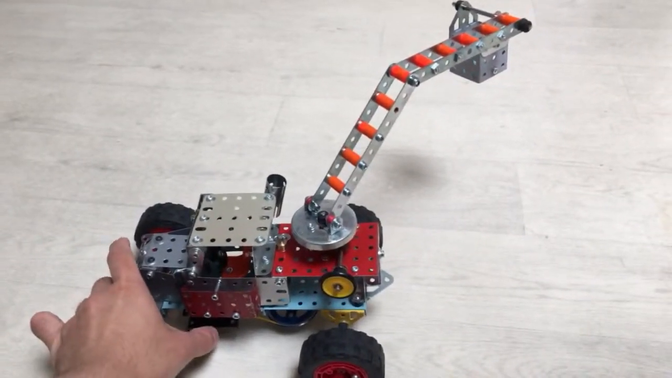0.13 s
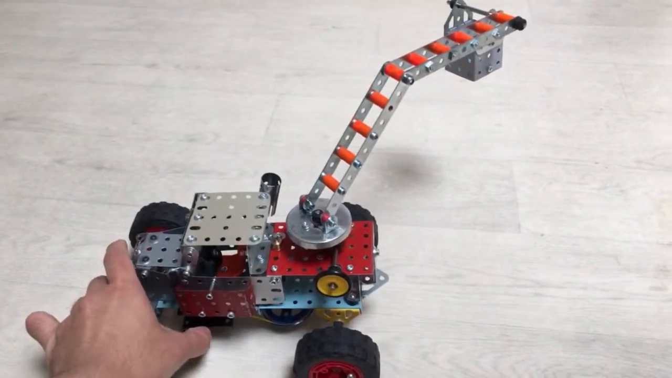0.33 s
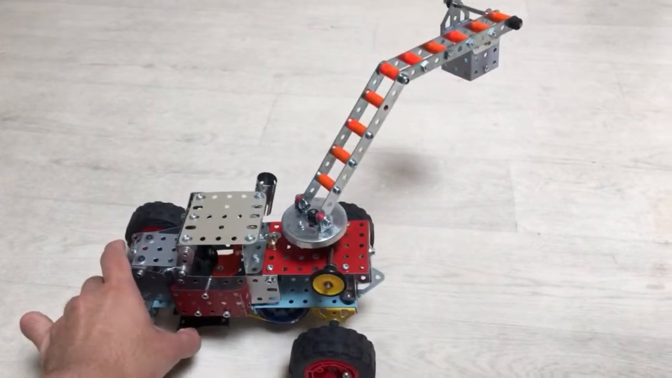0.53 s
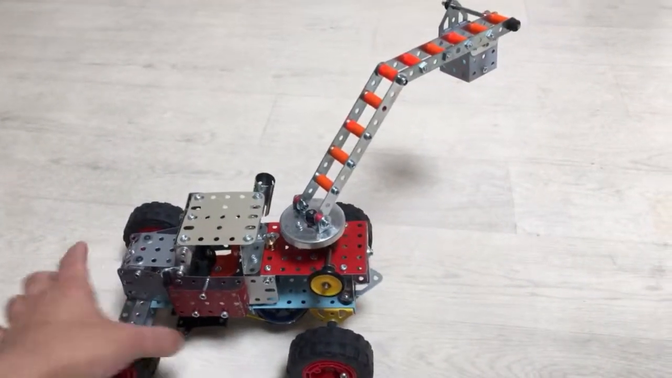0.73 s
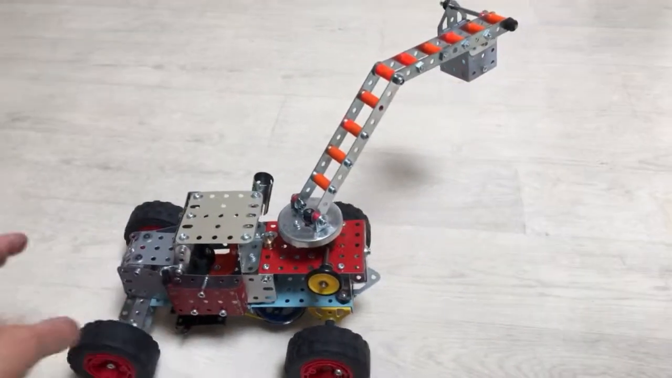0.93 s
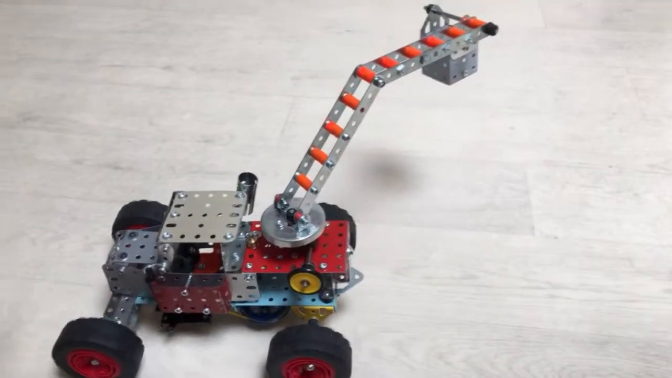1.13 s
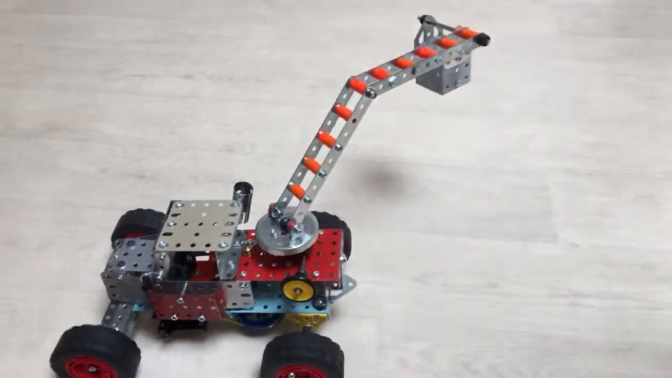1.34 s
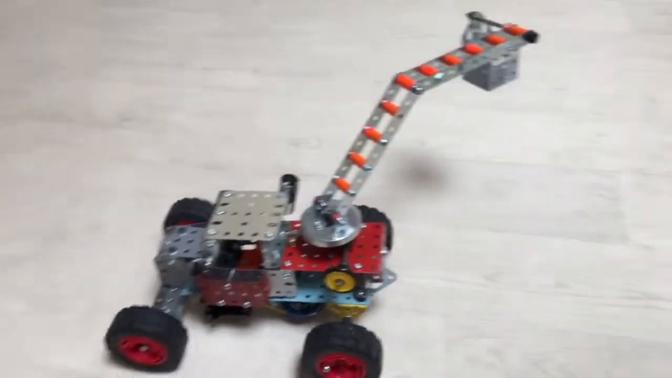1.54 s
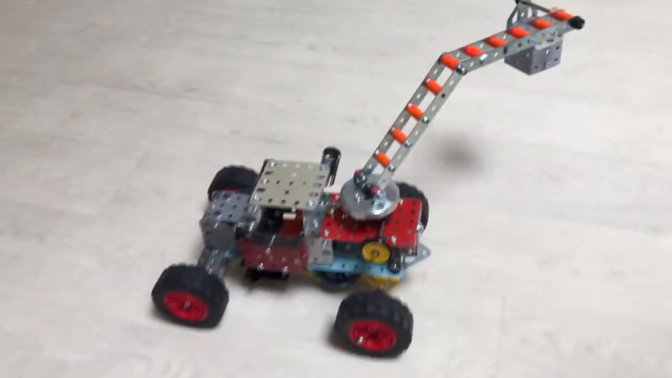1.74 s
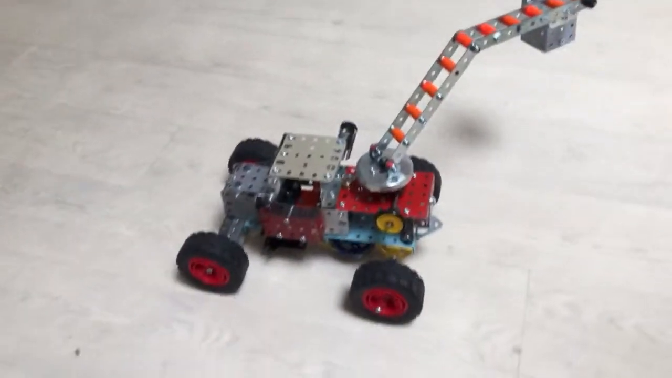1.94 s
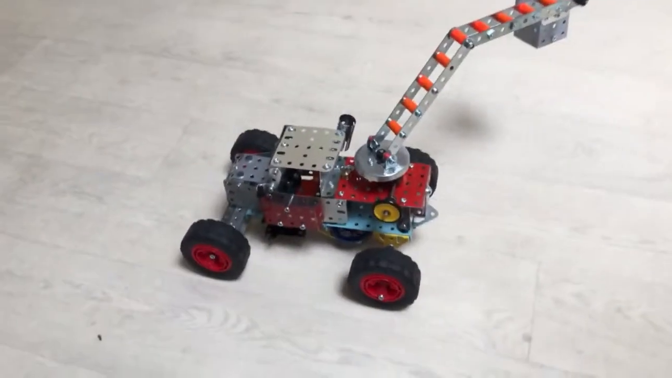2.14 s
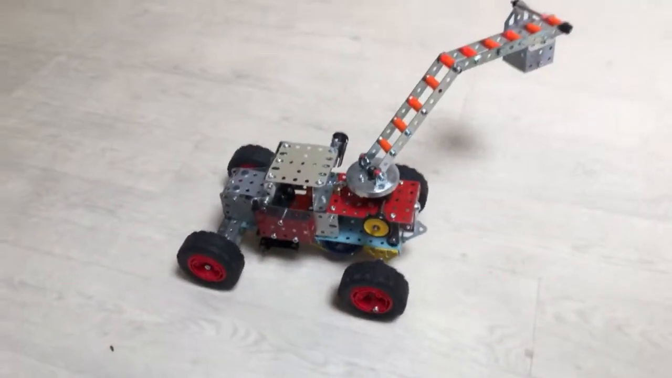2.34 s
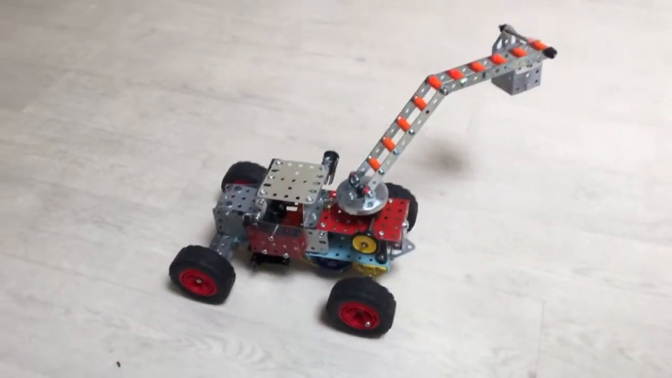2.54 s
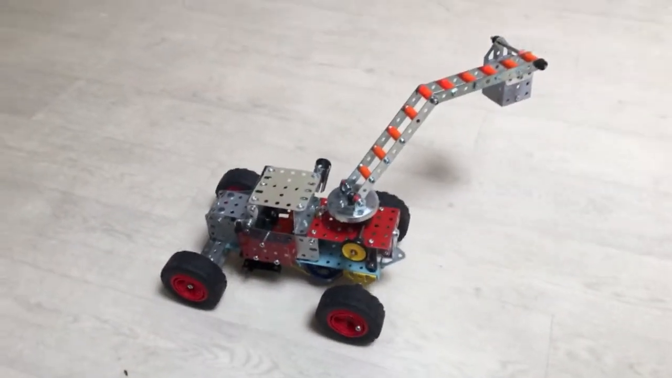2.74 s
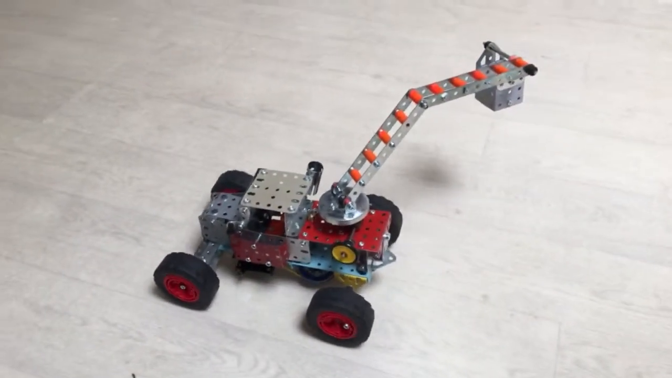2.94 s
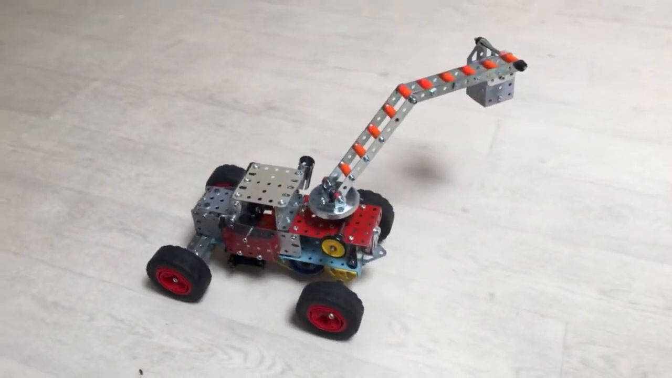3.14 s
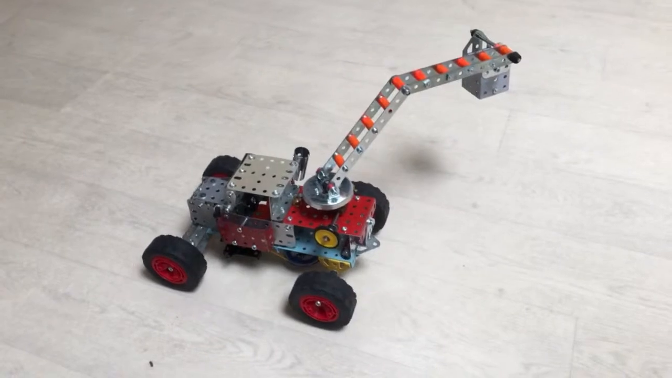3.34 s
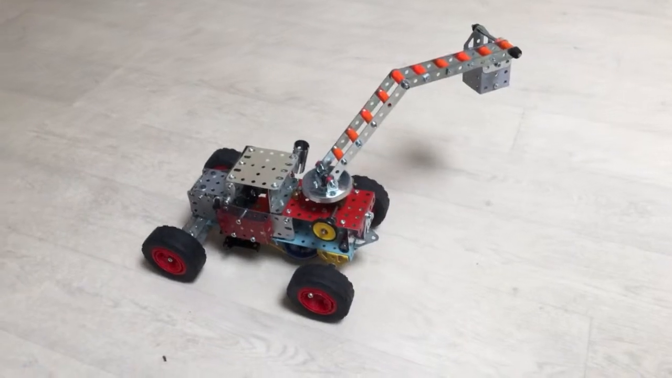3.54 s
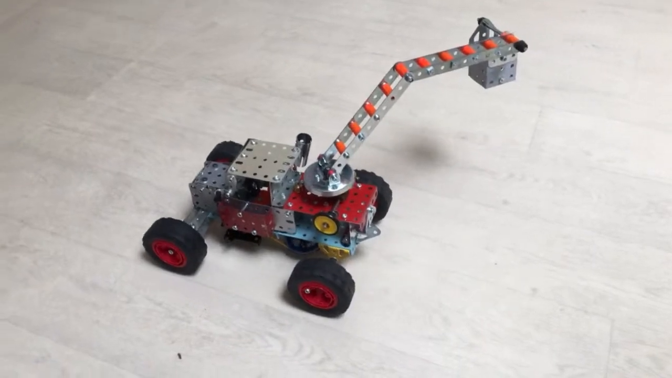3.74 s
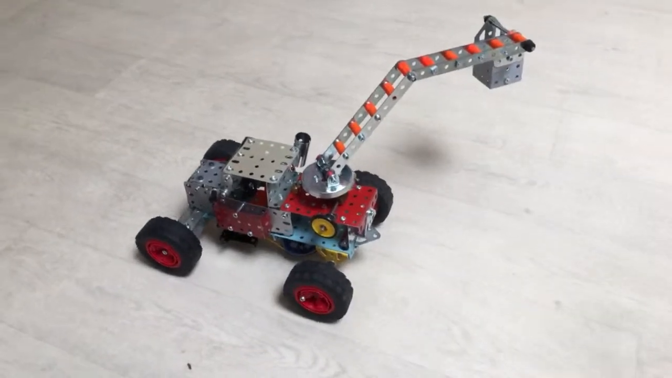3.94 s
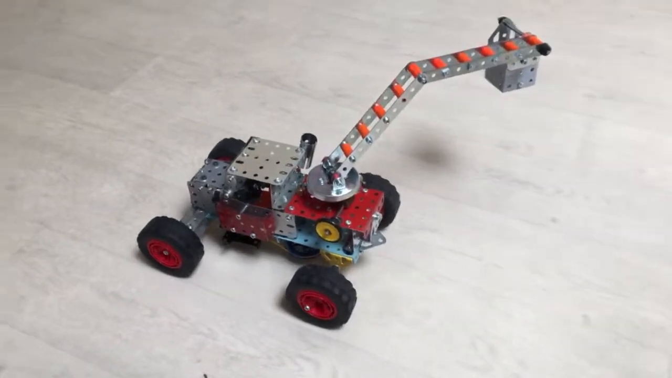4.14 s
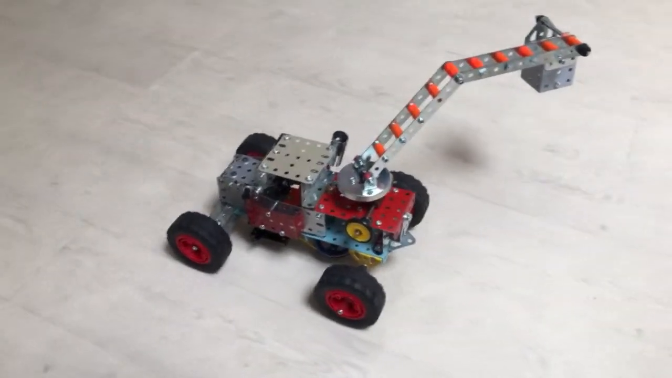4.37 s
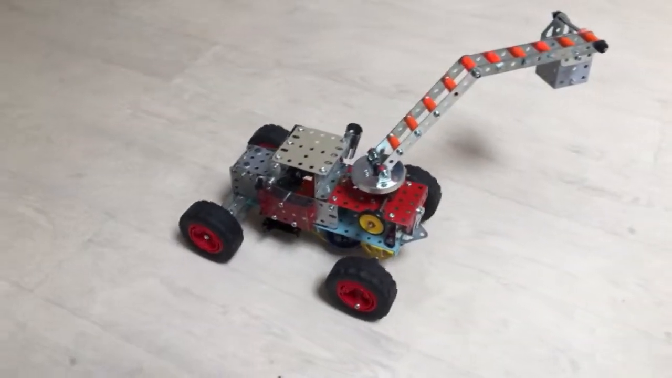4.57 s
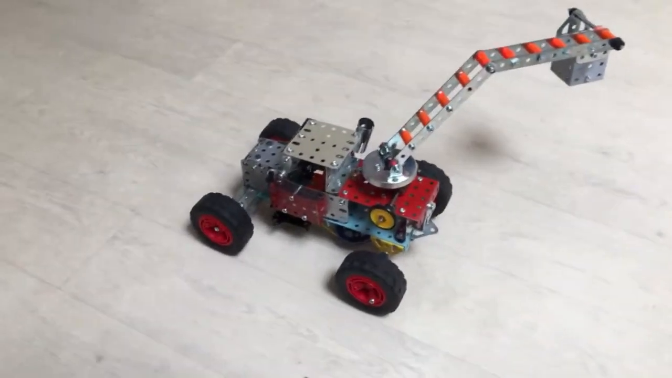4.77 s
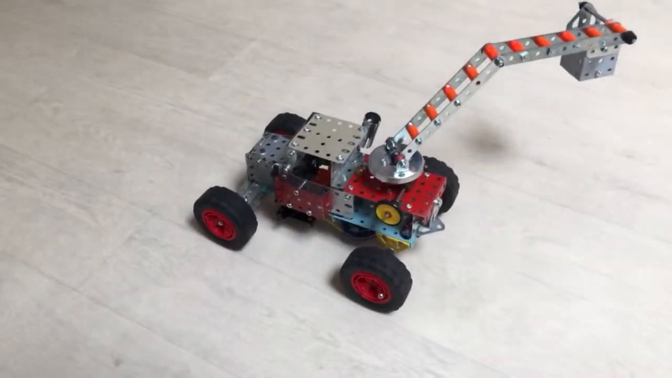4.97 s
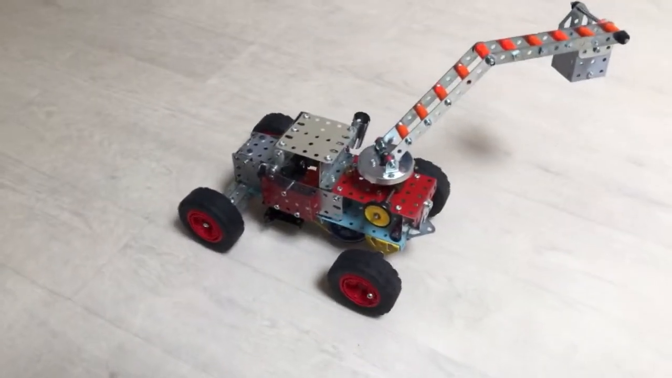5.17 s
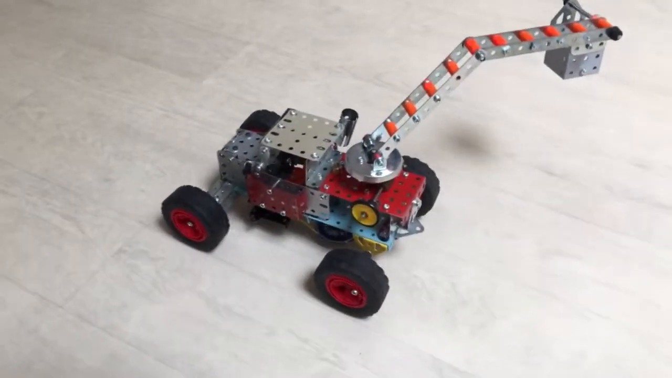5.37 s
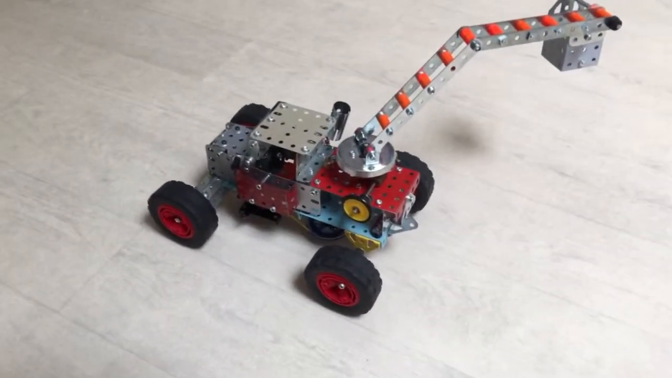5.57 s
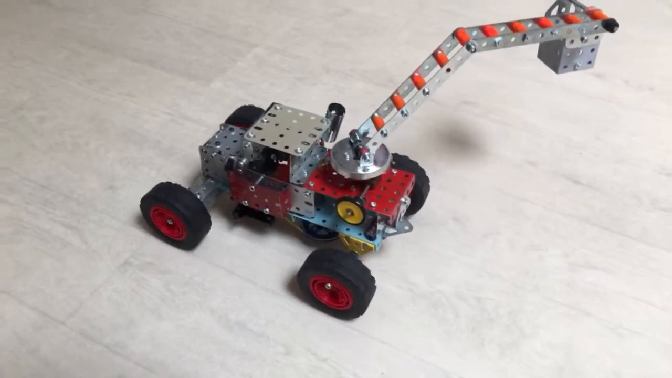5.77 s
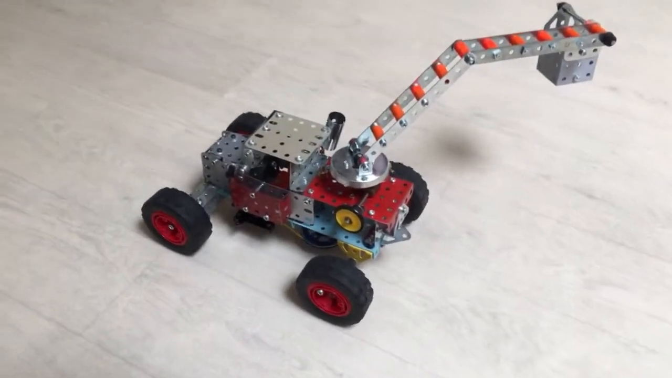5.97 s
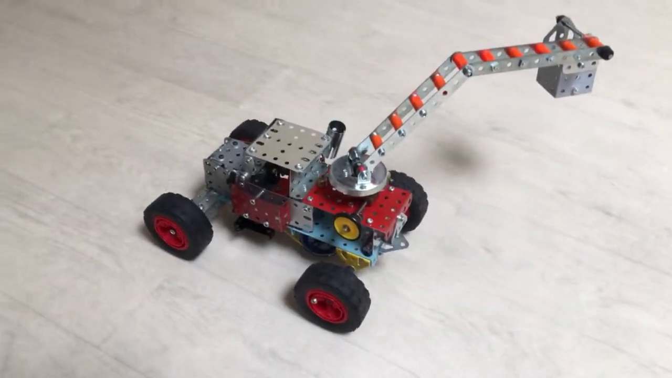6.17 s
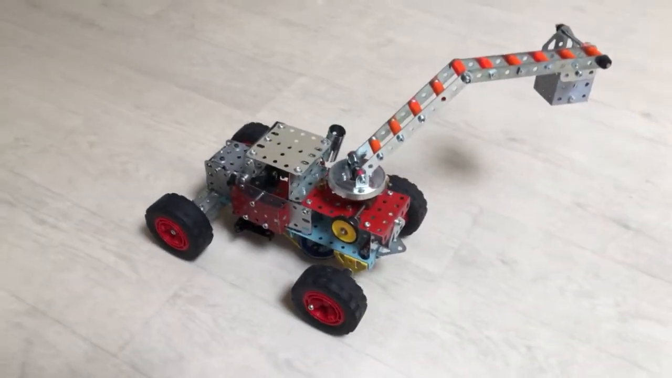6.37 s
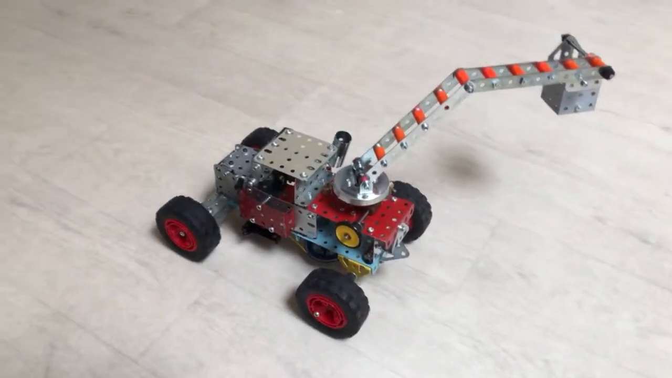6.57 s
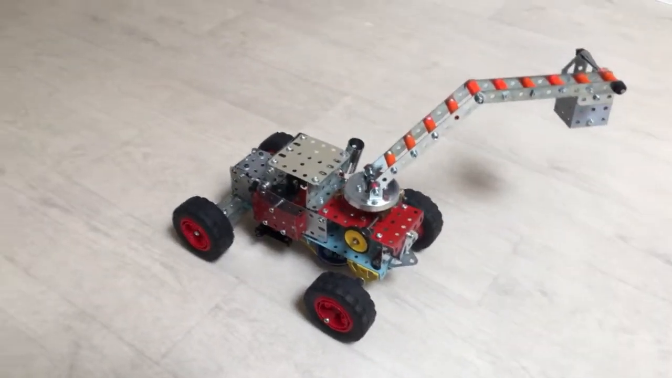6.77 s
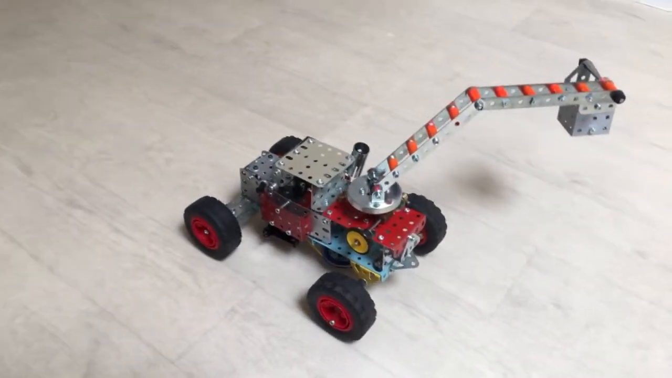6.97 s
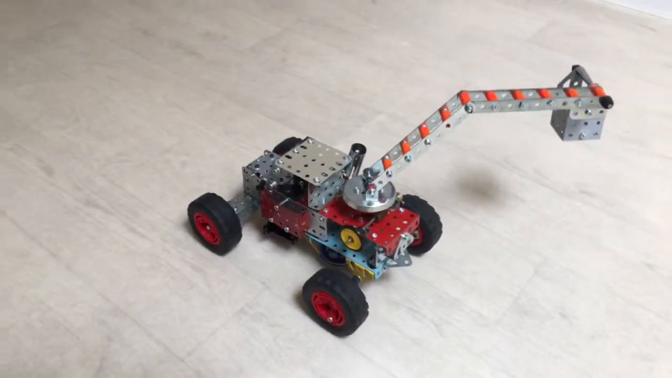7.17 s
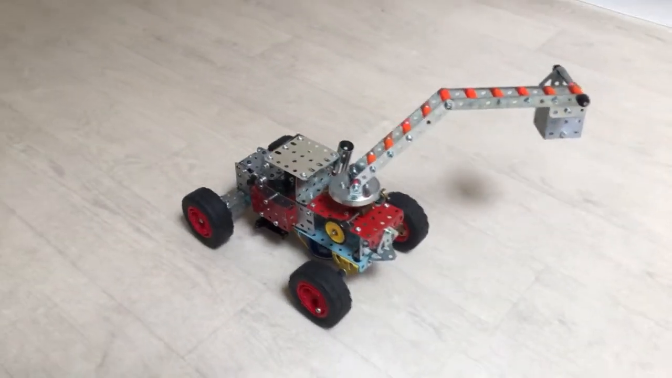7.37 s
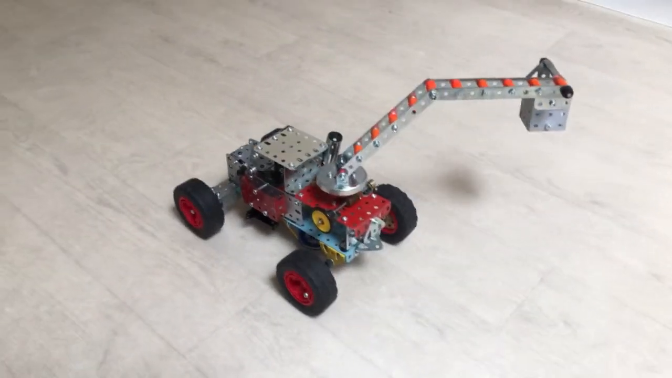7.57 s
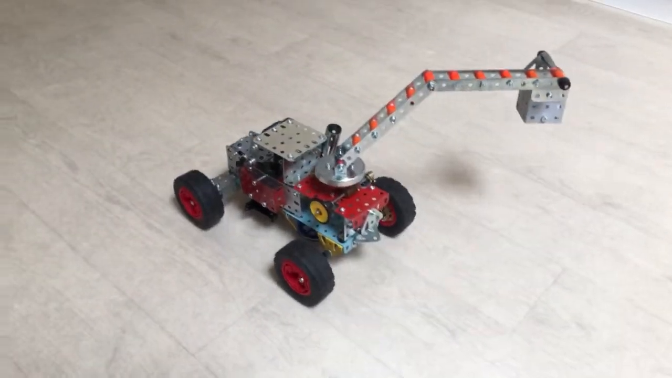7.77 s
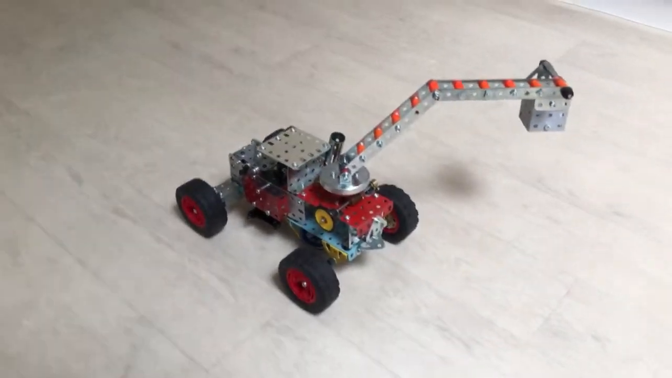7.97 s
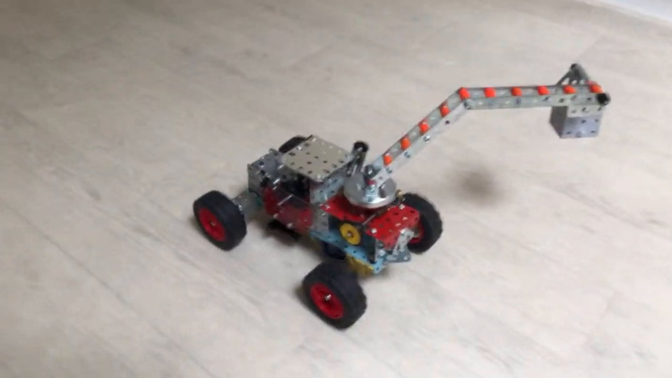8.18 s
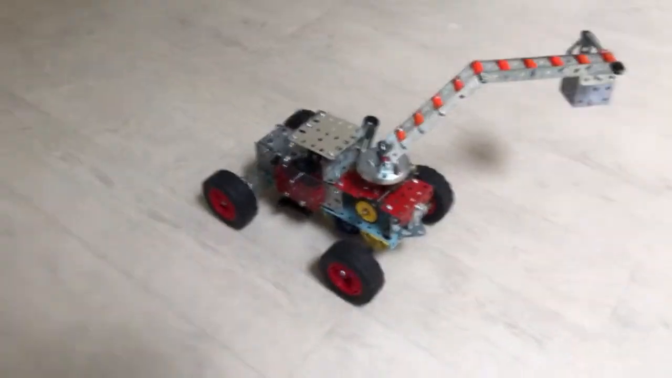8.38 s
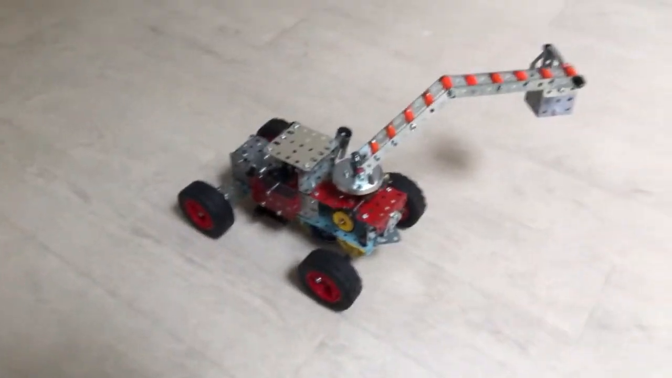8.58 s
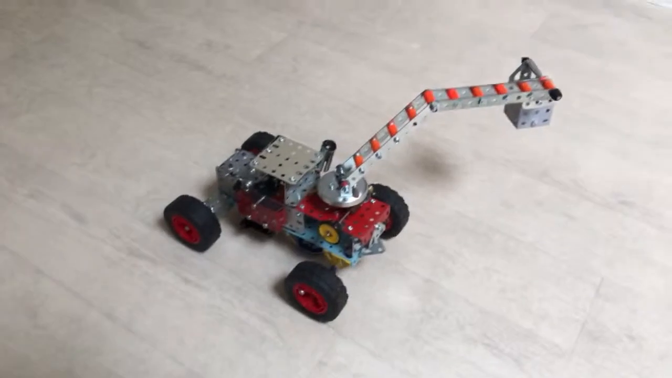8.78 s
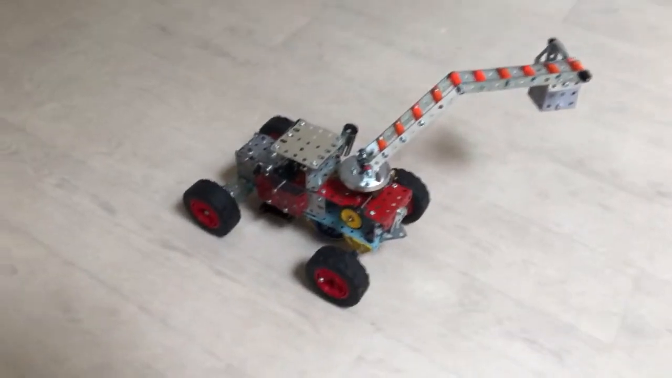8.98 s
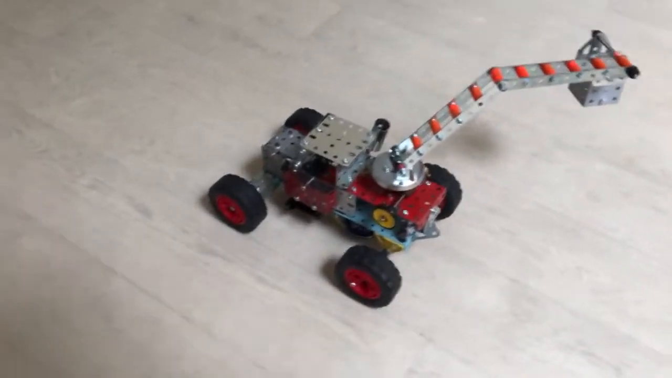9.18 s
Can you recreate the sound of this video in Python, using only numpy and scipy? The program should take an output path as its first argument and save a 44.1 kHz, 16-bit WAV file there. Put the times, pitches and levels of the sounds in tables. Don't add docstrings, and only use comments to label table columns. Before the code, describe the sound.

In a quiet room a sleeve rustles softly for a moment, then a metal wind-up truck is released. Its gears spin up at once into a dense, bright whirring rattle, with loose plates and pins buzzing and irregular sharp little clicks. It runs on to the end with slight changes of speed; late on, something small taps the floor. Heard fairly close on a handheld phone, mono, with a short room echo.

```python
import sys
import numpy as np
from scipy import signal
from scipy.fft import rfft, irfft, next_fast_len
from scipy.io import wavfile
from scipy.ndimage import uniform_filter1d

SR = 44100
rng = np.random.default_rng(int(sys.argv[2]) if len(sys.argv) > 2 else 0)


def amp(db):
    return 10 ** (np.asarray(db, float) / 20)


def write(x):
    x = np.atleast_2d(x).T
    wavfile.write(sys.argv[1], SR, np.round(np.clip(x, -1, 1) * 32767).astype(np.int16))


N = 406161
T = np.arange(N) / SR


def unit(x):
    return x / np.sqrt(np.mean(x ** 2))


def ramp(start_s, length_s):
    return np.clip((T - start_s) / length_s, 0, 1)


def walk(rate_hz):
    hold = int(SR / rate_hz)
    levels = np.repeat(rng.standard_normal(N // hold + 1), hold)
    return 0.95 * uniform_filter1d(levels, hold)[:N]


def resonate(x, hz, width_hz):
    return signal.lfilter(*signal.iirpeak(hz, hz / width_hz, SR), x)


def ring(x, modes):
    return sum((-1) ** k * amp(db) * resonate(x, hz, width_hz) for k, (hz, width_hz, db) in enumerate(modes))


def rattle(force, modes, flutter_db=1.5, drift_db=2.5):
    rough = rng.standard_normal(N) * amp(flutter_db * walk(25) + drift_db * walk(1.29))
    turn = np.linspace(-1, 1, N)
    out = np.zeros(N)
    for k, (hz, width_hz, db, turn_db) in enumerate(modes):
        share = force * np.roll(rough, k * SR * 5 // 7)
        out += amp(db + turn_db * turn) * resonate(share, hz, width_hz)
    return out


def scrape(times, db, decay_s, rise_s=0.001):
    power = np.zeros(N)
    np.add.at(power, np.clip((times * SR).astype(int), 0, N - 1), amp(2 * db))
    power = signal.lfilter([1], [1, -np.exp(-2 / (decay_s * SR))], power)
    return np.abs(uniform_filter1d(power, max(int(rise_s * SR), 1)))


# (crest time [s], level [dB])
RUMBLE_SWELLS = [(.2, -65), (.55, -63), (.9, -61), (1.3, -59), (1.7, -62), (2.1, -59), (2.4, -62),
                 (2.7, -66), (3.16, -62), (3.32, -57), (3.65, -64), (3.96, -62), (4.28, -64), (4.6, -62),
                 (4.93, -59), (5.25, -57.5), (5.52, -62), (5.9, -60.5), (6.23, -62), (6.48, -63),
                 (6.67, -67), (6.8, -57), (7.0, -61), (7.28, -62), (7.6, -56.5), (7.9, -57), (8.15, -58),
                 (8.57, -64), (8.8, -59), (9.03, -60)]


def rumble():
    floor_db, swell_s = -65.5, 0.084
    noise = resonate(resonate(rng.standard_normal(N), 63.6, 28), 67.5, 74)
    noise = unit(noise)
    even = noise / np.sqrt(uniform_filter1d(noise ** 2, SR // 12))
    swells = sum(amp(2 * db) * np.exp(-((T - s) / swell_s) ** 2) for s, db in RUMBLE_SWELLS)
    return even * np.sqrt(amp(2 * floor_db) + swells)


# (frequency [Hz], density [dB per Hz])
AIR_SPECTRUM = [(65, -48), (130, -15), (200, -8.5), (320, -11), (440, -21), (1060, -22.5), (1780, -28),
                (15700, -38)]


def still_air():
    level_db = -71.5
    hz, db = np.transpose(AIR_SPECTRUM)
    f = np.fft.rfftfreq(N, 1 / SR)
    shape = amp(np.interp(np.log(f + 1), np.log(hz), db, left=-60))
    return amp(level_db) * unit(irfft(rfft(rng.standard_normal(N)) * shape, N))


# (frequency [Hz], level [dB])
HUM_LINES = [(166, -81), (221, -97), (300, -77)]


def hum():
    return sum(np.sqrt(2) * amp(db + 2.0 * walk(4.2)) * np.sin(2 * np.pi * hz * T) for hz, db in HUM_LINES)


# (frequency [Hz], width [Hz], level [dB])
SLEEVE_MODES = [(950, 150, -5), (1500, 300, -7), (1950, 400, -0.5)]


def rustle():
    return amp(-56.5 - 60 * T) * ring(rng.standard_normal(N), SLEEVE_MODES)


# (time [s], mesh rate [Hz])
MESH_RATE = [(0.4818, 85.0), (0.6, 342.0), (0.73, 414.7), (1.07, 327.9), (1.32, 404.1), (2.07, 414.9),
             (2.55, 387.2), (3.28, 410.4), (3.46, 397.4), (4.0, 405.2), (4.94, 414.5), (6.34, 410.5),
             (6.53, 415.7), (7.1, 364.8), (7.42, 389.9), (8.22, 386.7), (8.82, 348.6), (9.21, 393.9)]
PINION_DB = [2, -0.5, -13, -9, 2.5, 2]


def teeth():
    s, hz = np.transpose(MESH_RATE)
    rate_hz = np.interp(T, s, hz)
    count = np.cumsum(np.interp(T, s, hz, left=0)) / SR
    k = np.arange(int(count[-1]))
    jitter, scatter = rng.standard_normal((2, len(k)))
    settled = np.clip((k - 6) / 30, 0, 1)
    start = int(s[0] * SR)
    times = s[0] + np.interp(k + 0.079 * settled * jitter, count[start:], T[:N - start])
    wheel_db = 1.1 * np.cos(2 * np.pi * (k - 26) / 33)
    drum_db = 0.49 * np.cos(2 * np.pi * (k - 18) / 48)
    db = np.resize(PINION_DB, len(k)) + wheel_db + drum_db + 1.9 * np.clip(scatter, -2, 2)
    return rate_hz, count, times, settled * db


def part(modes, times, db, scatter_db, decay_s, whir_db, flicker_db):
    scatter = np.clip(rng.standard_normal(len(db)), -2, 1.6) * np.clip((times - times[0]) * 10, 0, 1)
    ticks = scrape(times, db + scatter_db * scatter, decay_s)
    load_db = uniform_filter1d(np.interp(T, times, db), SR // 200)
    whir = amp(whir_db + 0.21 * load_db + flicker_db * walk(40)) * np.clip((T - 0.51) / 0.04, 0.08, 1)
    sound = rattle(np.sqrt(ticks / np.mean(ticks) + whir ** 2), modes)
    slow = np.sqrt(uniform_filter1d(sound ** 2, SR // 8) + 1e-6)
    return sound / slow


# (frequency [Hz], width [Hz], level [dB], gain as the truck turns away [dB])
CHASSIS = [(246, 250, -20.5, 1), (551, 20, -24, -5), (764, 143, -24, 4.5), (910, 250, -20, 0),
           (1310, 226, -9.5, 0.5), (1707, 290, -11, 2), (2043, 370, -11, -0.5), (2256, 227, -6, 4.5),
           (2453, 62, 0, 4.5), (2655, 89, -5, 2), (3419, 157, 0.5, 2.5), (3517, 300, -3, 1),
           (4146, 17, -1.5, 3.5), (5250, 1800, -10, 1.5)]
PLATES = [(4980, 170, -17, -7), (5440, 206, -9.5, -8), (6130, 2700, -15, 11.5), (6575, 450, -5, -4.5),
          (7100, 190, -4, 4), (7720, 330, -1.5, -5), (7604, 180, -11.5, 3), (7825, 190, 2, 6.5),
          (8370, 120, 1.5, 3.5), (8870, 480, 0, 4), (8900, 900, -18, -3)]
PINS = [(11950, 770, -20, .5), (12530, 760, 2.5, -1), (13830, 660, 1.5, -3), (14240, 220, 0, 1),
        (14850, 400, 6.5, 0.5), (15800, 370, -3.5, 2)]
STRIP = [(1883, 25, 0, 0)]


def gears(times, db, bright_db, pins_db, side_db):
    chassis_db = -(1 - ramp(0.46, 0.15))
    plates_db = -2.27 + 0.92 * bright_db
    strip_db = -20 + 0.4 * side_db + 3.9 * walk(14)
    out = amp(chassis_db) * part(CHASSIS, times, 0.4 * db, scatter_db=3.5, decay_s=0.0025,
                                 whir_db=3.0, flicker_db=1.9)
    out = out + amp(plates_db) * part(PLATES, times, 0.88 * db, scatter_db=2.9, decay_s=0.001,
                                      whir_db=0.5, flicker_db=0.53)
    out = out + amp(pins_db - 1.0) * part(PINS, times, 0.57 * db, scatter_db=5.7, decay_s=0.00052,
                                          whir_db=-0.5, flicker_db=1.2)
    return out + amp(strip_db) * part(STRIP, times, db, scatter_db=1.9, decay_s=0.0016,
                                      whir_db=2, flicker_db=1.4)


# (multiple of mesh rate [-], level [dB], share of side gain [0-1])
GEAR_TONES = [(6 / 6, -71.5, 0), (8 / 6, -76.5, 0), (11 / 6, -79, .9), (12 / 6, -81, .9), (14 / 6, -77, .4)]
# (time [s], level [dB])
STRIP_NOTES = [(2.06, -64), (4.36, -58), (4.52, -64), (4.66, -46.5), (4.93, -60), (5.33, -51), (5.62, -55),
               (5.82, -58), (6.36, -50), (6.55, -50), (6.66, -61), (6.87, -59)]


def whine(rate_hz, count, side_db, shade_start_s):
    frame_hz, frame_width_hz, note_half_s, note_order = 405, 22, 0.025, 27.5 / 6
    shade_db = -2 * ramp(shade_start_s - 0.6, 0.91)
    frame = amp(shade_db) / np.sqrt(1 + (2 * (rate_hz - frame_hz) / frame_width_hz) ** 2)
    tones = np.zeros(N)
    for order, db, share in GEAR_TONES:
        tones += amp(db + share * side_db + 2.9 * walk(13)) * np.sin(2 * np.pi * order * count)
    notes = sum(amp(db) * np.exp(-((T - s) / note_half_s) ** 2) for s, db in STRIP_NOTES)
    return np.sqrt(2) * (frame * tones + notes * np.sin(2 * np.pi * note_order * count))


# (time [s], pins peak [dB], plates above pins [dB])
LOUD_KNOCKS = [(0.6307, -13, -7), (0.674, -19, -3), (0.6914, -21, -12), (1.4537, -14, -8),
               (1.7191, -18, -18), (1.779, -17, -15), (1.8493, -20, -14), (1.9386, -25, -11),
               (2.3641, -19, -14), (2.5782, -21, -14), (3.5993, -17, -19), (3.6587, -17, -17),
               (3.7645, -14, -6.5), (4.175, -20, -10), (4.3551, -16, -16), (4.7497, -18, -12),
               (4.7926, -16, -8), (4.8216, -18, -16), (4.8794, -18, -17), (4.9518, -23, -17),
               (5.1847, -21, -23), (5.4476, 2, -10), (5.504, -21, -13), (5.8377, -15, -17),
               (6.3496, -15, -16), (6.5092, -15, -14.5), (6.8055, -19, -9), (8.3381, -27, -9),
               (8.451, -16, -14), (8.9836, -26, -21)]


def backlash(times, pins_db):
    turns = times[5::len(PINION_DB)]
    strength, balance = rng.standard_normal((2, len(turns)))
    usual_db = np.interp(turns, T, pins_db) + 11.5 + 3.5 * np.clip(strength, -3, 1.5)
    s, loud_db, loud_plates_db = np.transpose(LOUD_KNOCKS)
    when = np.r_[turns + 0.0004, s + 0.0013]
    knock_db = np.minimum(np.r_[usual_db, loud_db], -15)
    plates_db = knock_db + np.r_[-19 + 3 * balance, loud_plates_db]
    pins_power = scrape(when, knock_db, decay_s=0.0003, rise_s=0.0008)
    plates_power = scrape(when - 0.0004, plates_db, decay_s=0.00066, rise_s=0.0035)
    return amp(3) * rattle(np.sqrt(pins_power), PINS) + amp(10) * rattle(np.sqrt(plates_power), PLATES)


# (time [s], level at full speed [dB], brightness [dB])
TRUCK_HEARD = [(.56, -39.5, 8.5), (.7, -42, 8), (1.0, -42.5, 8.5), (1.5, -41, 7.5), (2.0, -41.5, 6),
               (2.6, -42, 7.5), (3.2, -42.5, 7), (3.7, -42, 6.5), (4.3, -41.5, 6.5), (4.9, -42, 7.5),
               (5.5, -41.5, 7), (6.1, -42, 8), (6.7, -42.5, 7.5), (7.1, -42, 8), (7.8, -43, 9),
               (8.4, -41.5, 6), (8.9, -41, 5), (9.21, -42.5, 7.5)]


def truck():
    full_hz, bright_hz = 391, 220
    shade_start_s, shade_end_s, shade_turn_s = 6.65, 8, 0.47
    rate_hz, count, times, db = teeth()
    moving_hz = rate_hz
    s, level_db, bright_db = np.transpose(TRUCK_HEARD)
    lurch_db = 0.5 * walk(20)
    level_db = np.interp(T, s, level_db) + 20 * np.log10(moving_hz / full_hz) + lurch_db
    bright_db = np.interp(T, s, bright_db)
    shade = ramp(shade_start_s, shade_turn_s) - ramp(shade_end_s, shade_turn_s)
    pins_db = bright_db + 20 * np.log10(np.minimum(moving_hz / bright_hz, 1)) - 3 * shade
    side_db = 8 * (ramp(4, 0.37) - ramp(6.5, 0.37))
    running = gears(times, db, bright_db, pins_db, side_db) * amp(level_db - 0.12)
    running = running + whine(rate_hz, count, side_db, shade_start_s)
    return running * ramp(0.44, 0.053) ** 2 + backlash(times, level_db + pins_db)


# (time [s], peak [dB])
TAP_BLOWS = [
    (8.3362, -22),
    (8.353, -33),
]
# (frequency [Hz], width [Hz], level [dB])
FLOOR_MODES = [(290, 160, -7), (500, 300, -4), (900, 350, -3), (1400, 450, 0)]


def scuff_and_tap():
    scuff_s, scuff_length_s, scuff_db = 4.41, 0.046, -38
    force = amp(scuff_db) * np.exp(-((T - scuff_s) / scuff_length_s) ** 2) * rng.standard_normal(N)
    for s, db in TAP_BLOWS:
        i = int(s * SR)
        force[i - 12:i + 6] -= amp(db + 10) * np.hanning(18)
    return resonate(ring(force, FLOOR_MODES), 740, 1400)


def room(x):
    t60_s, onset_s, hop = 0.51, 0.0026, SR // 4
    t = np.arange(SR // 3) / SR
    window = np.sin(np.pi * np.arange(2 * hop) / (2 * hop))
    out = np.zeros(N + 2 * SR)
    for start in range(0, N, hop):
        tail = rng.standard_normal(len(t)) * amp(-60 * t / t60_s) * np.clip(t / onset_s, 0, 1)
        piece = x[start:start + 2 * hop] * window[:N - start]
        echo = signal.fftconvolve(piece, tail / np.sqrt(np.sum(tail ** 2)))
        out[start:start + len(echo)] += echo
    return out[:N]


def scene():
    background = rumble() + still_air() + hum() + rustle()
    toy, floor = truck(), scuff_and_tap()
    return (toy + floor + room(amp(-8.0) * toy + amp(-2.5) * floor) + background)[None]


def top_cut(x):
    return signal.sosfilt(signal.butter(12, 16590, fs=SR, output="sos"), x)


def record(dry):
    top_hz, slope_hz = 15760, 90
    size = next_fast_len(N + SR // 4)
    keep = np.clip((top_hz - np.fft.rfftfreq(size, 1 / SR)) / slope_hz, 0, 1) ** 2
    mix = irfft(rfft(dry, size) * keep, size)[:, :N]
    return top_cut(mix)


dry = scene()
out = record(dry)
write(out)
```